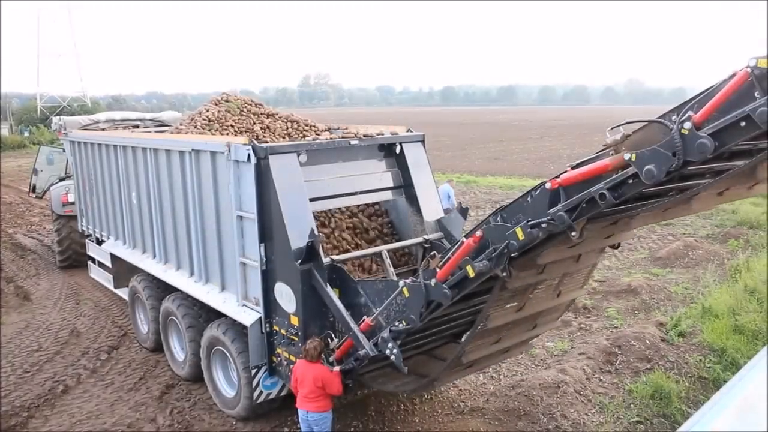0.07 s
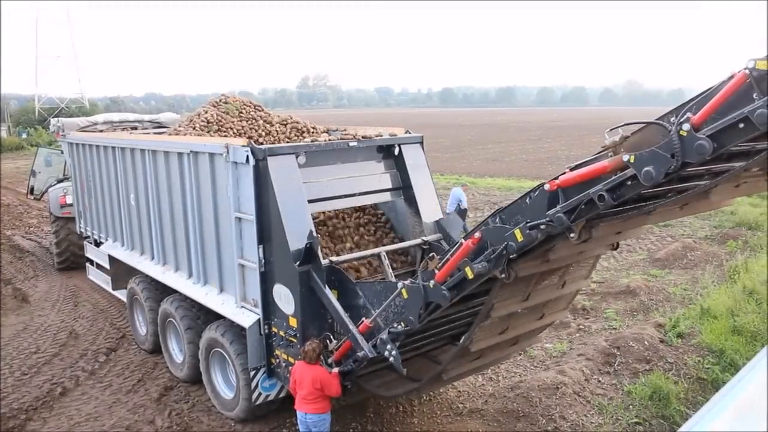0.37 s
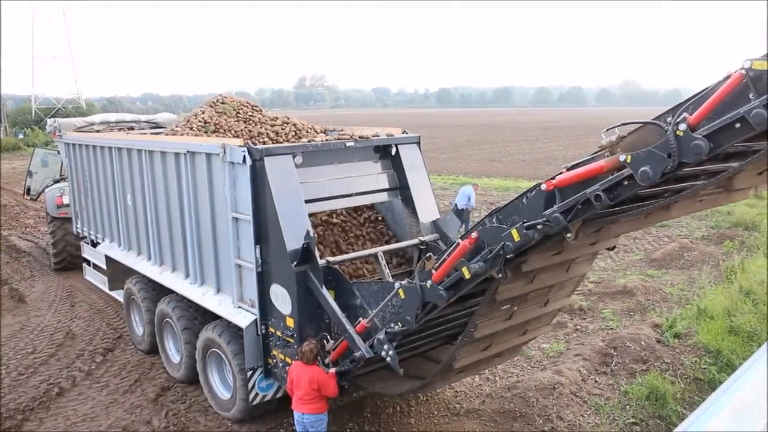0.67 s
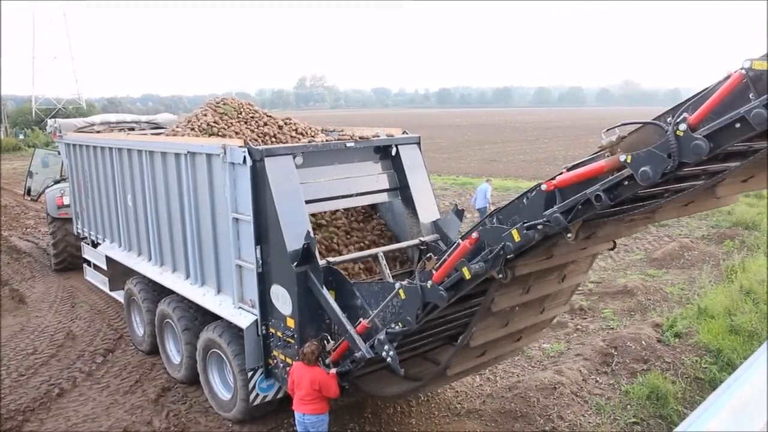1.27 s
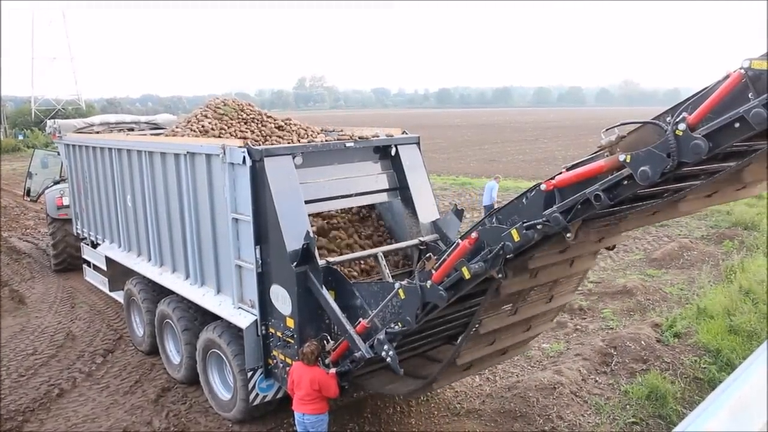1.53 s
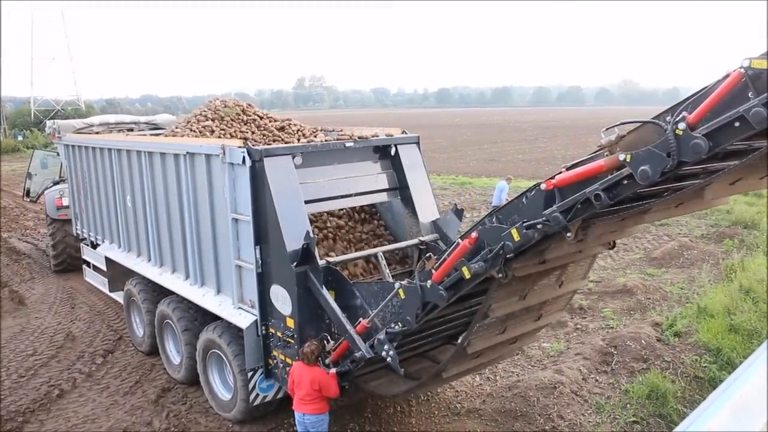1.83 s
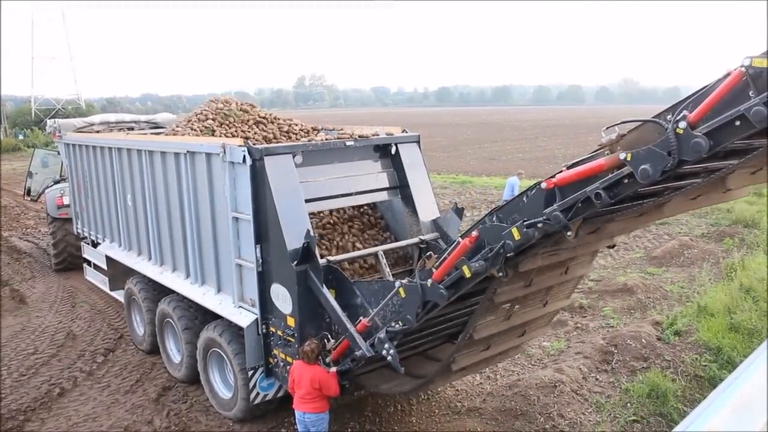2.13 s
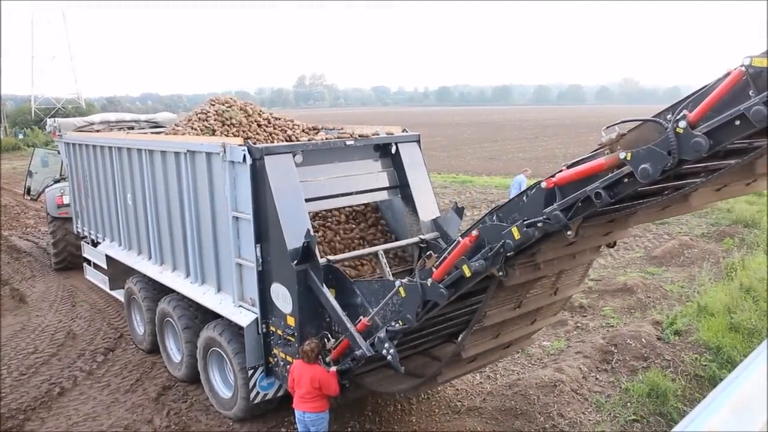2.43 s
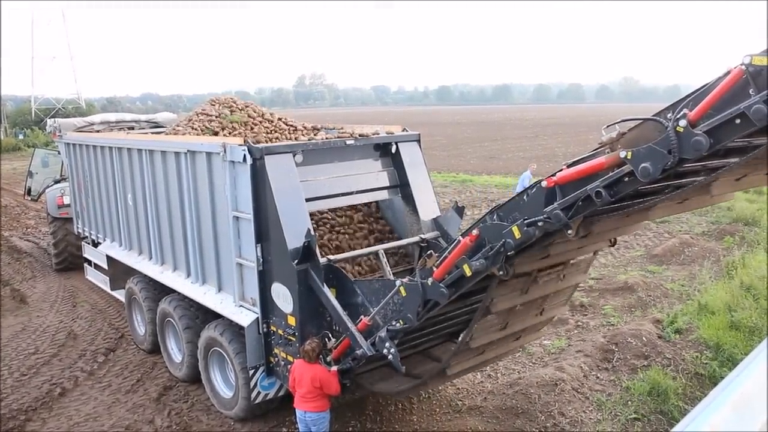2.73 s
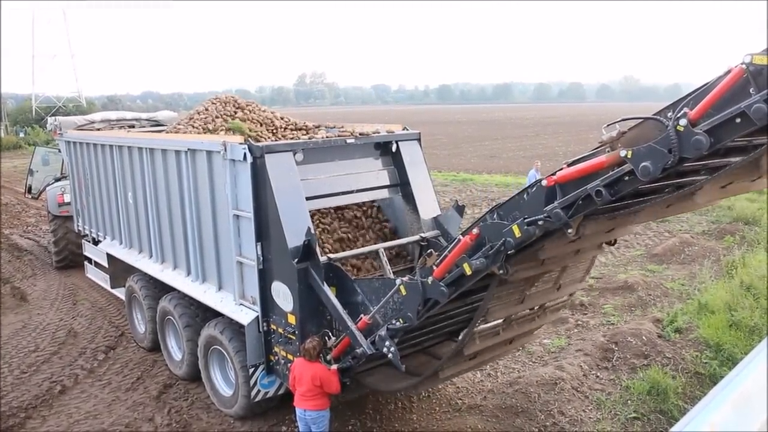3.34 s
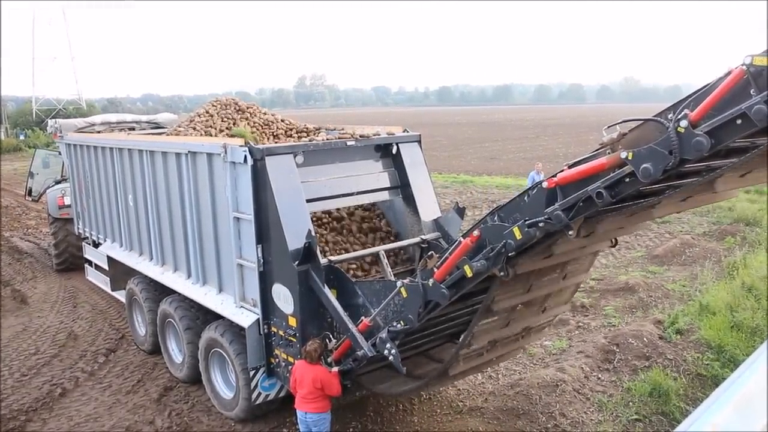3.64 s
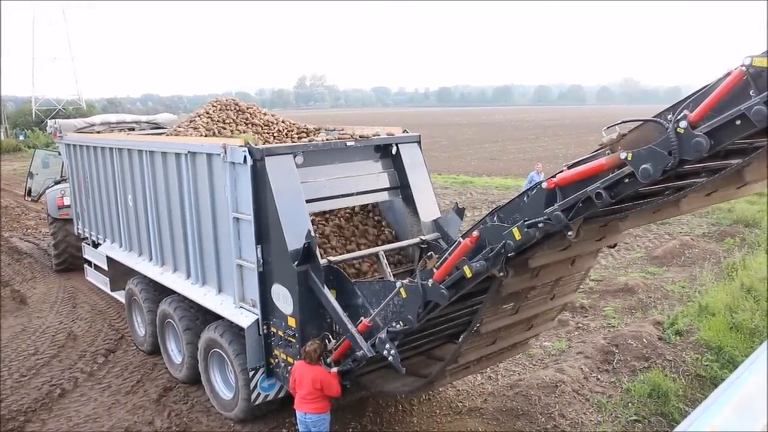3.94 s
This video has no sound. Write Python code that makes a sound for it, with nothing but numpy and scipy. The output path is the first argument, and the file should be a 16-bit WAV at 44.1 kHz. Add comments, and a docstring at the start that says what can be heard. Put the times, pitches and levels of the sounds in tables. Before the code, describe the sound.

A stream of potatoes drums into a hopper, thudding on the belt and knocking against steel plates. Throughout, the conveyor clatters unevenly, the trailer wall gives soft booms and outdoor gusts rumble on the microphone.

```python
"""Potatoes onto a steel conveyor

A trailer unloads in an open, windy field. Potatoes tumble into the hopper, thump on the belt,
knock on side plates, clack on bare steel and clatter down the chute, and the trailer wall booms.
The conveyor rattles in short bursts, grit ticks on the metal and the drive whines faintly.
Gusts buffet the microphone."""
import sys
import numpy as np
from scipy import signal
from scipy.fft import rfft, irfft
from scipy.io import wavfile
from scipy.ndimage import uniform_filter1d, minimum_filter1d

SR = 44100
rng = np.random.default_rng(int(sys.argv[2]) if len(sys.argv) > 2 else 0)


def file_out(sig):
    """Save sig as 16-bit WAV at sys.argv[1]."""
    # one column per channel
    cols = np.atleast_2d(sig).T
    # limit, then scale
    lim = np.clip(cols, -1, 1)
    pcm = np.round(lim * 32767).astype(np.int16)
    wavfile.write(sys.argv[1], SR, pcm)


N = 176400


def amp(db):
    return 10 ** (np.asarray(db) / 20)


def unit(x):
    return x / np.sqrt(np.mean(x ** 2) + 1e-20)


def fader(points):
    """Gain over time from (time [s], level [dB]) points."""
    return amp(np.interp(np.arange(N) / SR, *np.transpose(points)))


def add(mix, s, sound):
    part = mix[..., max(round(s * SR), 0):][..., :sound.shape[-1]]
    part += sound[..., :part.shape[-1]]


def colour(x, spectrum, modes=(), size=8192):
    """Causal filter of unit power: a smooth EQ curve plus ringing resonances."""
    hz = abs(np.fft.fftfreq(size, 1 / SR))
    eq_hz, eq_db = np.transpose(spectrum)
    db = np.interp(np.log(hz + 1), np.log(eq_hz), eq_db)
    db += sum(boost / (1 + (2 * (hz - centre) / width) ** 2) for centre, width, boost in modes)
    minimum_phase = np.exp(np.conj(signal.hilbert(np.log(amp(db)))))
    ring = np.fft.ifft(minimum_phase).real[:size // 2]
    return signal.oaconvolve(x, ring[None] / np.linalg.norm(ring), axes=1)[:, :N]


def place(pair, likeness, right_db):
    """Two unrelated signals become a stereo pair of given likeness and balance."""
    c = np.clip(likeness, -.99, .99)
    mid, side = pair[0] * np.sqrt((1 + c) / 2), pair[1] * np.sqrt((1 - c) / 2)
    return np.array([(mid + side) * amp(-right_db / 2), (mid - side) * amp(right_db / 2)])


def impacts(per_s, spread_db, ring_s, wash):
    """Random blows of uneven size, each with a short noisy tail, over a wash of countless tiny ones."""
    size = amp(spread_db * np.minimum(rng.exponential(1, N), 3.5)) * (rng.random(N) < per_s / SR)
    power = signal.lfilter([1], [1, -np.exp(-2 / (ring_s * SR))], size ** 2)
    return unit(noise(power / power.mean() + wash ** 2))


def noise(power):
    """Two channels of white noise that follow a power envelope."""
    return np.sqrt(power) * rng.standard_normal((2, N))


def strike(t, rise_s, ring_s):
    """Envelope of a blow: a quick rise, then an exponential decay."""
    return np.clip(t / rise_s, 0, 1) * np.exp(-np.maximum(t - rise_s, 0) / ring_s)


def blows(rows):
    """Summed power of blows given as (time [s], level [dB], attack [s], decay [s])."""
    power, t = np.zeros(N), np.arange(SR // 3) / SR
    for s, db, rise_s, ring_s in rows:
        add(power, s, (amp(db) * strike(t, rise_s, ring_s)) ** 2)
    return power


# Swell of the crop's rumble (time [s], level [dB])
CROP_FLOW = [(0, -23), (.3, -21), (.65, -26), (.9, -21.5), (1.4, -22.5), (1.7, -19.5), (1.9, -22),
             (2.25, -23), (2.65, -27), (3, -22.5), (3.3, -27), (3.7, -26.5), (3.85, -25.5), (4, -21.5)]
# Bass ride on that rumble (time [s], gain [dB])
BASS_RIDE = [(0, 6.5), (.4, 2.5), (1, 2), (1.4, -4), (1.8, 2.5), (2.4, 0), (3, -4), (4, -0.5)]
# Dull body of the hopper (frequency [Hz], gain [dB])
HOPPER_EQ = [(25, -20.5), (55, -12), (80, -10.5), (103, -5.5), (130, -4.5), (195, -3.5), (275, -7),
             (375, -7), (440, -12), (500, -7.5), (700, -24), (1200, -29), (3000, -72)]
# Hopper panel resonances, also heard in the knocks (frequency [Hz], width [Hz], boost [dB])
PANEL_MODES = [(181.3, 18, 6.5), (386, 6.3, 2.5), (482.6, 7.7, 0.5)]

def tumbling():
    """A stream of potatoes drums on the hopper and belt."""
    taps = rng.uniform(-1.06, 1, N) * (rng.random(N) < 300 / SR)  # about 300 a second
    drumming = impacts(per_s=100, spread_db=1.5, ring_s=.008, wash=.5) * np.array([[.7], [1]])
    drumming[0] += 0.9 * unit(taps)
    rumble = place(colour(drumming, HOPPER_EQ, PANEL_MODES), likeness=0.99, right_db=2.5)
    rumble *= fader(CROP_FLOW)
    bass = signal.sosfiltfilt(signal.butter(2, 160, fs=SR, output="sos"), rumble)
    return rumble + bass * (fader(BASS_RIDE) - 1)


# Load on the conveyor, riding its clatter, grit and whine (time [s], level [dB])
BELT_LOAD = [(0, 6.5), (.25, 2), (.6, 6), (.72, 1.5), (1.05, 3.5), (1.4, 2), (1.52, 5.5), (1.85, 4.5),
             (2.2, 6.5), (2.5, 3), (2.67, -0.5), (2.8, 5), (3.18, 6), (3.3, -6), (3.47, -2), (3.6, 4.5),
             (3.75, 2), (4, 3)]
# Bursts of rattle (time [s], level [dB], attack [s], decay [s])
RATTLE_BURSTS = [(0.0144, -27.5, 0.023, 0.026), (0.0665, -23.5, 0.011, 0.035), (0.1344, -24, 0.023, 0.029),
                 (0.279, -23.5, 0.0089, 0.033), (0.32, -22.5, 0.0052, 0.017), (0.5484, -22.5, 0.016, 0.022),
                 (0.783, -28, 0.0083, 0.086), (0.8344, -21, 0.012, 0.023), (0.9694, -26, 0.0097, 0.017),
                 (1.016, -26.5, 0.0073, 0.05), (1.187, -21, 0.0087, 0.037), (1.4674, -28, 0.012, 0.049),
                 (1.6014, -23, 0.0075, 0.0039), (1.66, -21.5, 0.013, 0.045), (1.7294, -24.5, 0.031, 0.0096),
                 (1.905, -25, 0.0062, 0.022), (1.9415, -18.5, 0.012, 0.028), (2.107, -25, 0.0089, 0.04),
                 (2.3784, -19, 0.0014, 0.044), (2.529, -23, 0.014, 0.041), (2.698, -29, 0.0053, 0.029),
                 (2.7477, -27.5, 0.019, 0.065), (2.7874, -27, 0.018, 0.015), (2.8594, -30, 0.0082, 0.061),
                 (2.9487, -24, 0.0054, 0.012), (3.012, -24.5, 0.013, 0.029), (3.098, -24.5, 0.002, 0.023),
                 (3.1358, -24.5, 0.011, 0.041), (3.1655, -23.5, 0.031, 0.016),
                 (3.5274, -29.5, 0.0053, 0.017), (3.918, -26, 0.016, 0.021)]
# Bright top of the rattle (frequency [Hz], gain [dB])
CLASH_EQ = [(500, -2.5), (1300, 8), (2000, 1), (2800, -3), (3500, -1.5), (4500, -7), (5800, -17.5),
            (7300, -11), (9000, -17), (11000, -34), (15500, -49)]
# Low body of the rattle (frequency [Hz], gain [dB])
CLANK_EQ = [(150, -46), (350, 18.5), (520, 5.5), (750, 2.5), (1100, -3.5), (1550, -2.5), (2100, -14.5),
            (3500, -56.5), (9000, -56.5)]
# Steel frame resonances, also heard in the clacks (frequency [Hz], width [Hz], boost [dB])
FRAME_MODES = [(1060.5, 27, 7.5), (1560, 35, 0.5), (1849, 40, 8.5), (2376, 37, 7.5), (2590, 41, 7.5),
               (3030, 36, 6), (3260, 72, 3), (3490, 33, 8), (3750, 74, 5.5), (4350, 59, 8), (4820, 120, 6)]

def conveyor():
    """Chain and slats chatter on the frame: a bed of clatter with bursts of dense blows."""
    load, burst_power = fader(BELT_LOAD), blows(RATTLE_BURSTS)
    clash = impacts(per_s=420, spread_db=-5, ring_s=0.009, wash=1)
    clash *= np.sqrt(burst_power * amp(-5) ** 2 + (load * amp(-48)) ** 2)
    clank = impacts(per_s=300, spread_db=2, ring_s=0.013, wash=1)
    clank *= np.sqrt(burst_power * amp(0.5) ** 2 + (load * amp(-34.5)) ** 2)
    return (place(colour(clash, CLASH_EQ, FRAME_MODES), likeness=0.82, right_db=7.5)
            + place(colour(clank, CLANK_EQ, FRAME_MODES), likeness=0.99, right_db=3.5))


# Stones ticking on steel (time [s], level [dB])
STONE_TICKS = [(.0228,-31),(.181,-31),(.284,-35),(.79,-32),(.837,-37),(.847,-24.5),(.9204,-30),(1.179,-28.5),(1.268,-29.5),(1.314,-30),(1.3554,-32),(1.401,-31),(1.4426,-28.5),(1.571,-31),(1.667,-37),(1.87,-31),(1.945,-26),(1.958,-27.5),(2.05,-32.5),(2.105,-36),(2.356,-29.5),(2.389,-26),(2.5376,-25.5),(2.892,-44),(3.055,-30),(3.143,-29.5),(3.173,-27),(3.3464,-33.5),(3.393,-33.5),(3.436,-31.5),(3.5685,-34),(3.621,-43)]
# Crisp tone of soil and stones (frequency [Hz], gain [dB])
GRIT_EQ = [(800, -10), (2500, 6.5), (4000, 4), (5800, 0.5), (7500, -2.5), (9300, -1.5), (11000, -14.5),
           (15500, -26)]

def grit():
    """Soil patters on the steel; larger stones tick clearly."""
    patter = amp(-49.5) * impacts(per_s=37, spread_db=0, ring_s=0.0093, wash=0.89)
    patter *= fader(BELT_LOAD) ** .5
    t = np.arange(SR // 12) / SR
    tick = strike(t, rise_s=0.0014, ring_s=0.0091)
    for s, db in STONE_TICKS:
        add(patter, s, amp(db - 6) * tick * rng.standard_normal((2, len(t))))
    return place(colour(patter, GRIT_EQ), likeness=0.48, right_db=4)


def whine(pitch_hz=6850, half_width_hz=10):
    """A thin, unsteady whine from the drive that fades when the load drops."""
    hz = np.fft.rfftfreq(N, 1 / SR)
    tone = irfft(rfft(noise(1)) / (1 + ((hz - pitch_hz) / half_width_hz) ** 2), N)
    return amp(-68) * place(unit(tone * fader(BELT_LOAD)), likeness=.6, right_db=7)


# Gusts on the microphone (time [s], level [dB])
WIND_GUSTS = [(0, -21), (0.2, -14.5), (0.42, -22), (0.58, -7.5), (0.8, -21), (0.95, -13), (1.1, -21),
              (1.33, -11.5), (1.53, -37), (1.8, -22), (2.0, -11.5), (2.35, -14.5), (2.62, -11.5),
              (2.88, -12), (3.2, -10.5), (3.5, -15), (3.68, -11.5), (4, -12.5)]
# Bass-heavy buffeting (frequency [Hz], gain [dB])
WIND_EQ = [(15, -27), (35, -8), (65, -2.5), (110, -2), (180, 2), (260, -4), (400, -9.5), (650, -22.5),
           (1200, -30), (3000, -65)]

def wind():
    """Lumpy turbulence, mostly opposite in phase in the two channels."""
    eddies = impacts(per_s=90, spread_db=2, ring_s=.018, wash=.6) * fader(WIND_GUSTS)
    return amp(-3.5) * place(colour(eddies, WIND_EQ), likeness=-0.65, right_db=0.55)


# Knocks on the conveyor's side plates (time [s], level [dB], pitch [Hz], decay [s])
PLATE_HITS = [(.012,-13,289,0.027),(.064,-15,378,0.045),(.117,-12.5,378,0.0088),(.192,-17,298,0.012),(.293,-9.5,517,0.0034),(.441,-15,303,0.026),(.588,-16,484,0.014),(0.734,-7,376,0.016),(.766,-10.5,300,.007),(.849,-16.5,377,0.01),(.982,-10,306,0.0037),(1.097,-9.5,301,0.01),(1.275,-17.5,430,0.0042),(1.439,-11.5,327,0.0095),(1.488,-6,391,0.0066),(1.494,-13.5,530,0.005),(1.56,-12,309,0.018),(1.607,-9.5,368,0.02),(1.672,-23,359,.013),(1.756,-17,470,0.011),(1.84,-13,377,0.026),(2.012,-23.5,390,0.027),(2.16,-11.5,298,0.043),(2.27,-17.5,482,0.0072),(2.312,-13.5,361.5,0.02),(2.407,-13.5,512,0.017),(2.519,-10,427,0.0057),(2.574,-12,370,0.008),(2.768,-14,490,.012),(2.934,-14,372,0.017),(3.0,-14.5,470,.007),(3.026,-17,322,0.011),(3.325,-14.5,383,0.0052),(3.638,-15,393,.014),(3.923,-11.5,403,0.0071)]
# Hollow tone of the plates (frequency [Hz], gain [dB])
PLATE_EQ = [(100, -29), (220, 7), (350, 10), (520, 6.5), (750, -2.5), (1100, -8), (1550, -13.5),
            (2100, -21.5), (3500, -38.5), (9000, -57)]

def knocks(rise_s=0.0031, scatter_ring_s=0.023, sag=0.032):
    """A potato hits a side plate: a hollow note, pitched by the spot struck, and a scattered ring."""
    notes, t = np.zeros(N), np.arange(SR // 5) / SR
    for s, db, hz, ring_s in PLATE_HITS:
        pitch = hz * (1 + sag * (2 * np.exp(-t / ring_s) - 1))
        tone = np.sin(2 * np.pi * (np.cumsum(pitch) / SR + rng.random()))
        add(notes, s, amp(db - 2) * strike(t, rise_s, ring_s) * tone)
    power = blows([(s, db - 9, rise_s, scatter_ring_s) for s, db, _, _ in PLATE_HITS])
    scatter = colour(noise(power), PLATE_EQ, PANEL_MODES)
    return place(scatter + np.array([notes, 0 * notes]), likeness=0.99, right_db=3)


# Heavy landings on the belt (time [s], level [dB], pitch [Hz], decay [s])
BELT_HITS = [(0.013,-6.5,188,0.029),(0.11,-2.5,216,0.01),(.228,0,190,0.019),(0.402,0,201,0.008),(.448,-5.5,108.3,0.031),(0.535,-6.5,207.5,0.019),(0.698,-3,107.5,0.025),(.974,-4,176,0.0079),(1.091,-3,198,0.0095),(1.167,-6,199.6,0.029),(1.318,-7.5,194,0.01),(1.362,0,243,0.0068),(1.469,-4.5,200,0.0072),(1.605,-4,238,0.014),(1.671,-3.5,203,.025),(1.741,-3.5,238,.009),(1.836,-4,203,0.012),(1.847,-5,229,0.023),(2.292,-5.5,247,0.016),(2.383,1,197.5,0.0061),(2.511,-5,216.4,0.027),(2.746,-5,194,0.018),(2.996,1,234,0.0042),(3.146,-8,200,0.011),(3.648,-8.5,223,0.0086),(3.787,-2.5,217,.008),(3.822,-4,194.5,0.022),(3.854,-6,276,0.0068)]

def thumps(rise_s=0.0086, sag=0.15):
    """A heavy potato pushes the belt: a few damped cycles that sag in pitch."""
    thuds, t = np.zeros(N), np.arange(SR // 4) / SR
    for s, db, hz, ring_s in BELT_HITS:
        pitch = hz * (1 + sag * (2 * np.exp(-t / ring_s / 2) - 1))
        tone = np.sin(2 * np.pi * (np.cumsum(pitch) / SR + rng.random()))
        add(thuds, s, amp(db - 6.5) * strike(t, rise_s, 2 * ring_s) ** 2 * tone)
    return place([thuds, 0 * thuds], likeness=0.78, right_db=2)


# Potatoes on bare steel (time [s], level [dB])
STEEL_HITS = [(0.015,-22),(0.148,-24),(.279,-26),(.294,-39),(0.563,-20),(.62,-25),(.835,-17.5),(.85,-38),(1.18,-18.5),(1.195,-13),(1.664,-25),(1.73,-20),(1.944,-24),(2.109,-33),(2.378,-32),(2.538,-28),(2.782,-33),(3.0139,-22.5),(3.097,-34),(3.135,-22.5),(3.178,-18)]
# Hard edge of a clack (frequency [Hz], gain [dB])
CLACK_EQ = [(400,-5),(1000,1.5),(1700,7.5),(2600,-10),(4200,-7.5),(5800,-27),(8500,-19.5),(11000,-44.5)]

def clacks(rise_s=0.00065, ring_s=0.0048):
    """A single hard contact sets the steel frame ringing briefly."""
    power = blows([(s, db - 4, rise_s, ring_s) for s, db in STEEL_HITS])
    return place(colour(noise(power), CLACK_EQ, FRAME_MODES), likeness=0.48, right_db=2)


# Booms of the trailer wall (time [s], level [dB])
WALL_HITS = [(0.229, -17.5), (0.346, -15), (0.497, -13), (0.864, -14), (0.988, -15.5), (1.38, -18),
             (1.721, -13.5), (2.016, -22.5), (2.299, -26), (2.623, -15.5)]

def booms(pitch_hz=106.2):
    """The trailer wall rings on one note, lower and longer than the thumps."""
    wall, t = np.zeros(N), np.arange(SR // 4) / SR
    envelope = strike(t, rise_s=0.0081, ring_s=0.042)
    for s, db in WALL_HITS:
        add(wall, s, amp(db - 1) * envelope * np.sin(2 * np.pi * (pitch_hz * t + rng.random())))
    return place([wall, 0 * wall], likeness=0.78, right_db=2)


# Clumps of potatoes coming down the chute (time [s], level [dB])
CHUTE_HITS = [(0.289, -26), (1.472, -21), (1.49, -21.5), (1.837, -28), (2.386, -23.5), (3.642, -28)]
# Boxy tone of the chute (frequency [Hz], gain [dB])
CHUTE_EQ = [(330, -18), (600, 13), (1450, -3.5), (2400, -22), (10000, -69)]

def clumps(rise_s=0.0046, ring_s=0.029):
    """Several potatoes strike the chute within moments and blur into one midrange clatter."""
    power = blows([(s, db, rise_s, ring_s) for s, db in CHUTE_HITS])
    return place(colour(noise(power), CHUTE_EQ), likeness=0.8, right_db=3.5)


def scene(lag_rad=.4):
    """The machinery sits to the right, so its left channel lags in phase; wind blows over it all."""
    left, right = (tumbling() + thumps() + booms() + conveyor() + clacks() + knocks()
                   + grit() + whine() + clumps())
    analytic = signal.hilbert(np.concatenate([left, left[::-1]]))[:N]
    left = (analytic * np.exp(-1j * lag_rad)).real
    return np.array([left, right]) + wind()


def record(dry, ceiling=.97, cutoff_hz=15850):
    """Master chain: widen the top octave, catch peaks with a quick limiter, then low-pass."""
    mid, side = dry.mean(0), (dry[0] - dry[1]) / 2
    shelf = signal.firwin2(63, [0, 9000, 10800, SR / 2], amp([0, 0, 6.5, 6.5]), fs=SR)
    side = signal.lfilter(shelf, 1, np.pad(side, (0, 31), "edge"))[31:]  # stays in time with the mid
    wide = np.array([mid + side, mid - side])
    safe_gain = np.minimum(ceiling / (abs(wide).max(0) + 1e-9), 1)
    gain = uniform_filter1d(minimum_filter1d(safe_gain, size=301), size=301)
    lowpass = signal.firwin(511, cutoff_hz, window=("kaiser", 9), fs=SR)
    return signal.oaconvolve(wide * gain, lowpass[None], "same")


dry = scene()
out = record(dry)
file_out(out)
```